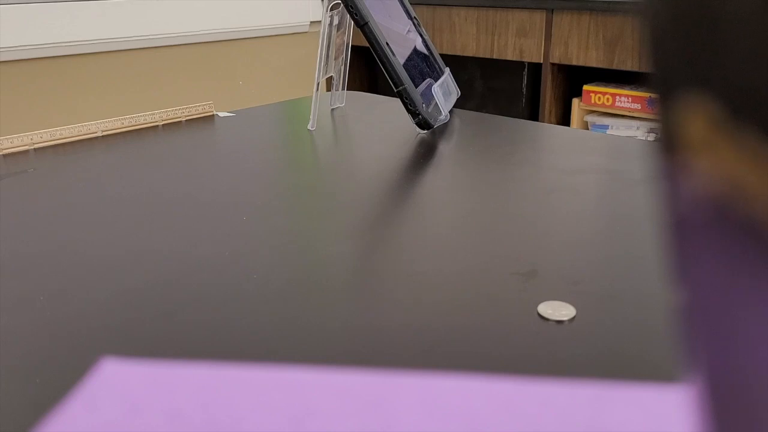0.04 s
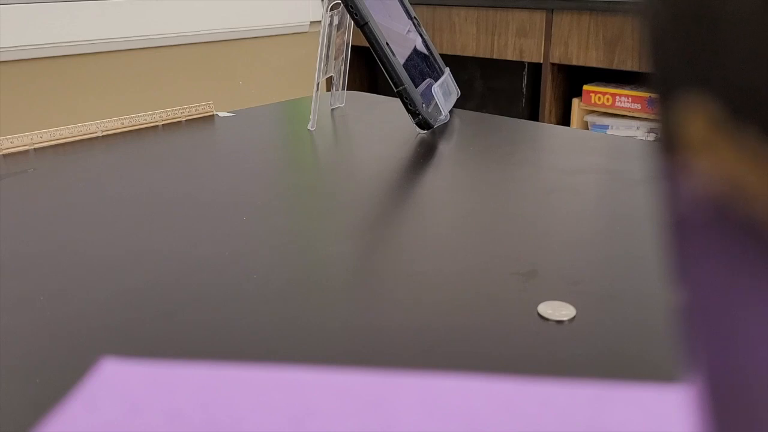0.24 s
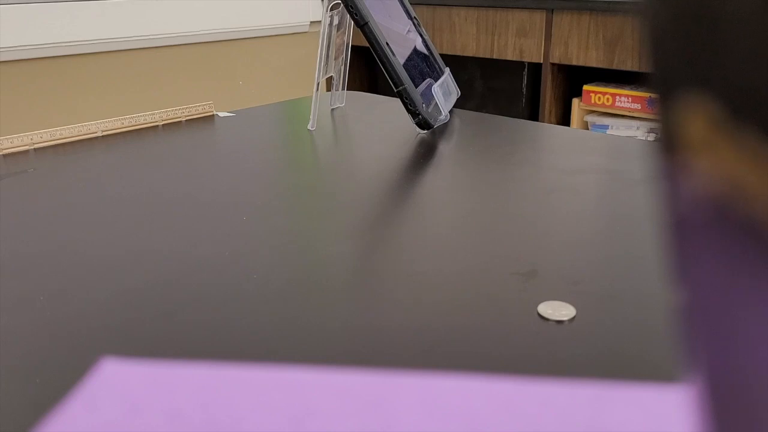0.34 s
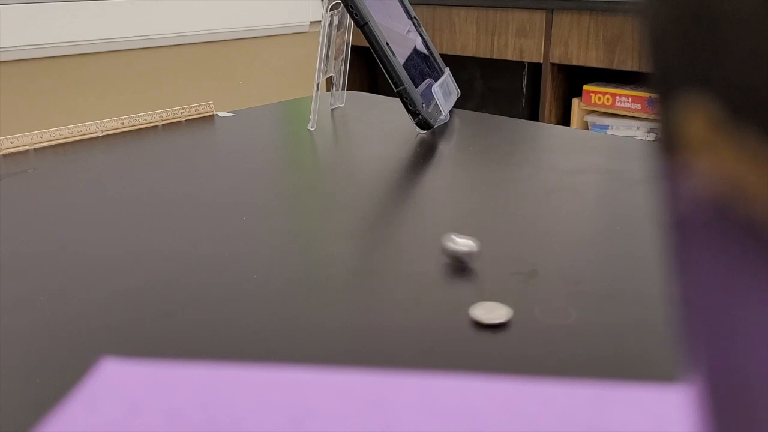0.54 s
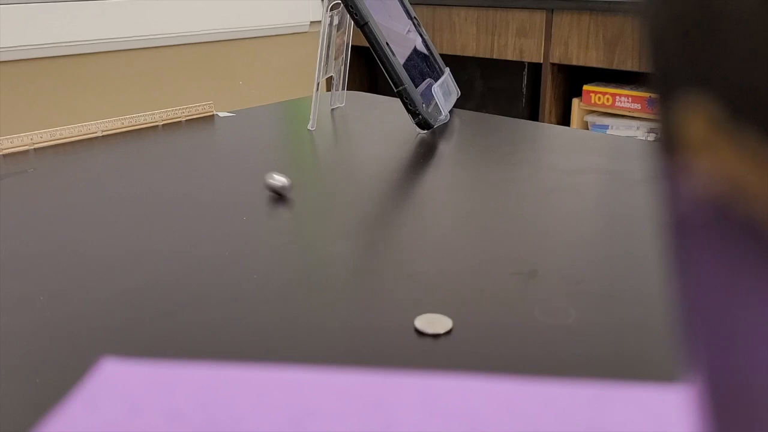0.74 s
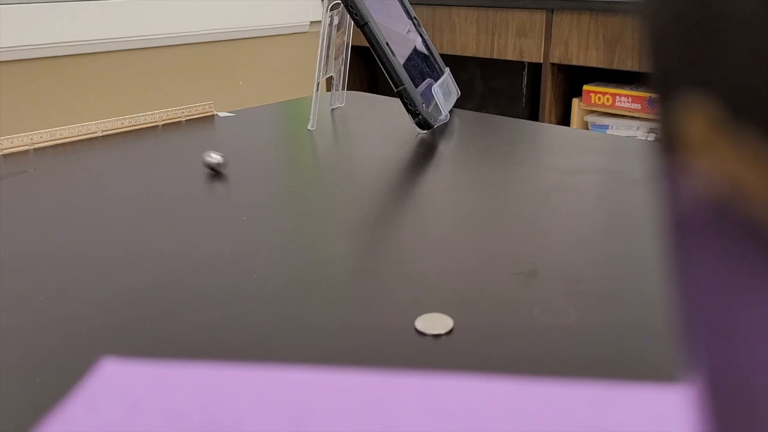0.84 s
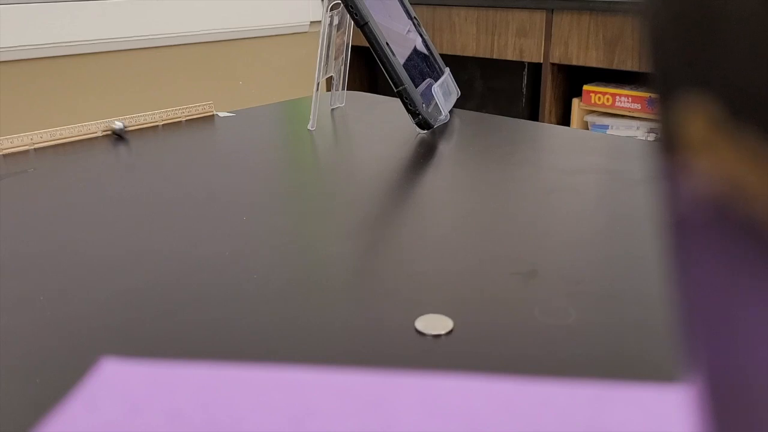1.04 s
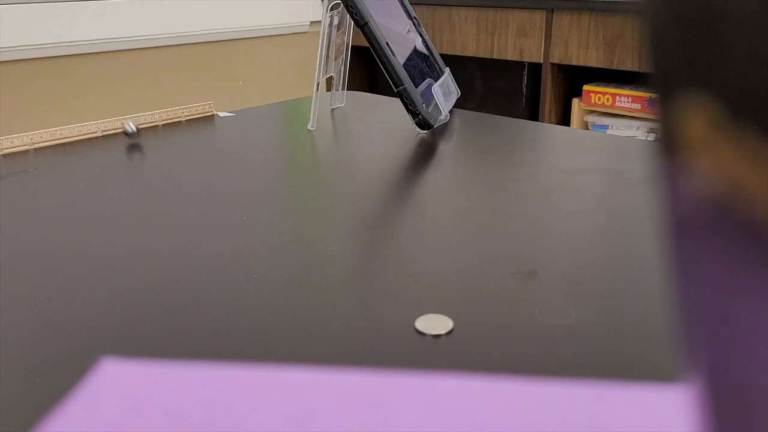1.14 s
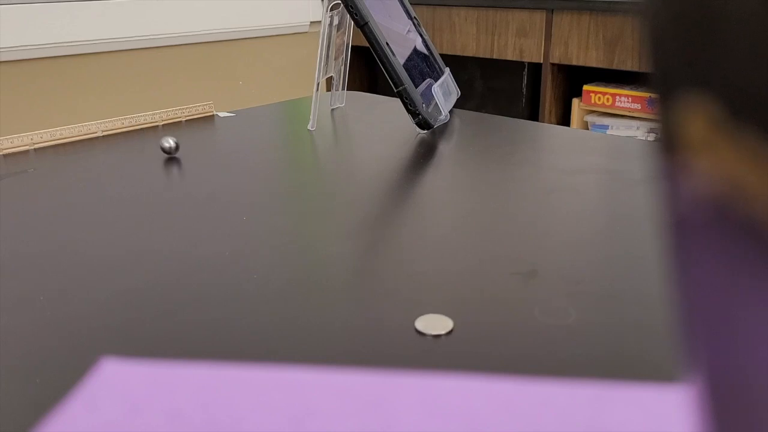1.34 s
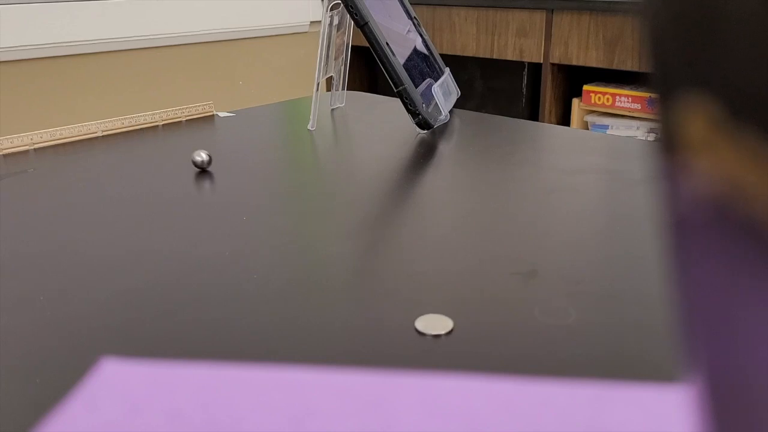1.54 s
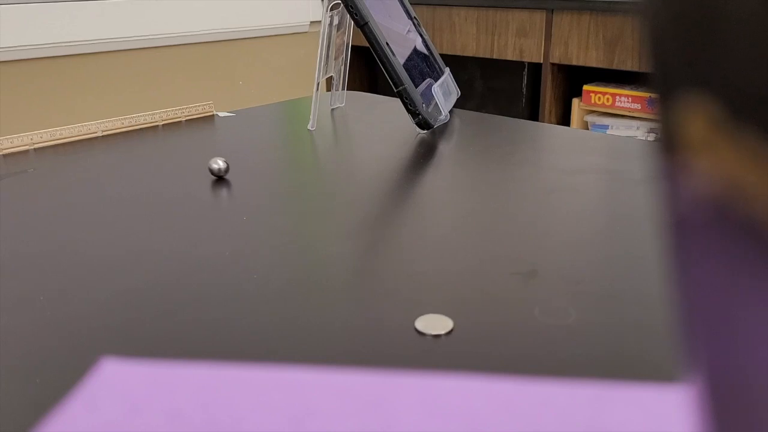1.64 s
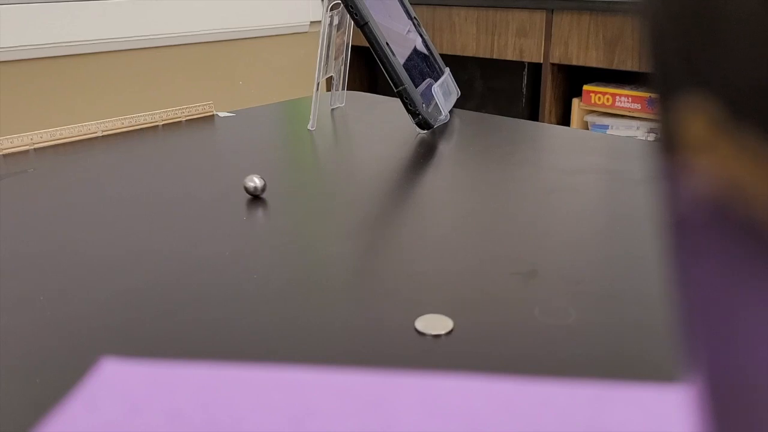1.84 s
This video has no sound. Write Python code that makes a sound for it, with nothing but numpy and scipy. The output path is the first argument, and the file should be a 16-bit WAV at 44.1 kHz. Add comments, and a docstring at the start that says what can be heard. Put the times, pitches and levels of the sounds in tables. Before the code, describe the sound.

A small steel ball bounces on a hard tabletop from 0.2 seconds in quickening, fading knocks. At 0.5 it hops afresh and clips a coin, which chatters with a very high ring until about 1.0. The ball rolls from 0.75, clacks brightly against a rail at 1.1, bounces again from 1.2 to 1.6, then rolls softly back. The microphone is on the table, in a small room with faint ventilation.

```python
"""Steel ball and coin on a tabletop

A small steel ball bounces across a hard tabletop in ever quicker hops, each a knock that sets the
board ringing. It clips a coin, which chatters and rings, then rolls on, clacks against the rail at
the far edge, bounces again and rolls slowly back. A phone on the table hears the board, a small
room and faint ventilation."""
import sys
import numpy as np
from scipy import signal
from scipy.fft import rfft, irfft
from scipy.io import wavfile
from scipy.ndimage import uniform_filter1d, minimum_filter1d

SR = 44100
rng = np.random.default_rng(int(sys.argv[2]) if len(sys.argv) > 2 else 0)


def waveform_to_disk(signal):
    """Save audio, clipped to [-1, 1], as 16-bit WAV at the path in sys.argv[1]."""
    frames = np.transpose(np.atleast_2d(signal))
    scaled = np.clip(frames, -1, 1) * 32767
    samples = np.round(scaled).astype(np.int16)
    wavfile.write(sys.argv[1], SR, samples)


N = 83790
T = np.arange(N) / SR
HZ = np.maximum(np.fft.rfftfreq(N, 1 / SR), 1)
KNOCK_SAMPLES = 2048
KNOCK_HZ = np.maximum(np.fft.rfftfreq(KNOCK_SAMPLES, 1 / SR), 1)
WAVE_LAG_S, WAVE_LAG_HZ = 0.00049, 980  # a bending wave's travel time at this pitch; lows come later
RAIL_S = 1.108

# Three runs of quickening hops: start_s, level_db, cutoff_hz
BALL_HOPS = [(.2112, 1, 4000), (.2753, 1, 3200), (.3272, 0.5, 2920), (.3688, -1, 2870), (.4014, -4.5, 3080),
             (.4296, -7, 2780), (.4518, -8.5, 3200), (.4712, -10, 2820), (.4866, -12, 2920),
             (.5064, -2.5, 3630), (.556, -1.5, 2970), (.599, -2.5, 2900), (.6342, -4, 2650),
             (.6658, -4.5, 2700), (.6892, -4.5, 2680), (.712, -8, 2400), (.731, -11.5, 2500),
             (.745, -13.5, 2400), (.76, -18, 2000), (1.2052, -1, 3900), (1.2838, -2.5, 3130),
             (1.3468, -2.5, 2600), (1.3978, -1.5, 2400), (1.4408, -2, 2400), (1.476, -5, 2400),
             (1.5054, -5.5, 2400), (1.5298, -7.5, 2400), (1.5505, -10, 2400), (1.569, -12.5, 2400),
             (1.585, -13, 2400), (1.598, -14, 2300), (1.611, -19, 2300), (1.623, -19, 2220),
             (1.634, -21, 2100)]
# Cues between the four places, as the ball passes the coin, nears the edge and rolls back: start_s
PLACE_CUES = [.49, .85, 1.64]


def ball():
    """Every hop and rolling bump pushes the board: a sharp knock first, then a ringing tail."""
    echo_noise = rng.standard_normal((300, 2, KNOCK_SAMPLES))
    hops = [(s, db, contact(cutoff_hz, tick=undb(-34.5))) for s, db, cutoff_hz in BALL_HOPS]
    bumps = rolling()
    ringing_bumps = [(s, db + 1, push) for s, db, push in bumps]  # rolling rings a little more
    return knocks(hops + bumps, echo_noise) + board_ring(hops + ringing_bumps)


# Swell and fade of the rolling rumble: time_s, level_db
ROLL_LEVELS = [(.74, -19), (.84, -18.5), (.89, -12), (.94, -13.5), (.99, -18), (1.07, -17), (1.098, -15),
               (1.11, -59), (1.58, -60), (1.63, -34), (1.68, -27), (1.74, -24.5), (1.82, -24.5),
               (1.9, -23.5)]


def rolling(out_hz=1970, back_hz=1305):
    """Rolling is a stream of tiny bumps, duller on the way back, when the ball is slower."""
    bumps = patter(ROLL_LEVELS, per_s=92, jitter=0.2, scatter_db=-1.3)
    return [(s, db, contact(out_hz if s < RAIL_S else back_hz)) for s, db in bumps]


def contact(cutoff_hz, tick=0):
    """Spectrum of one push: the contact softens the highs, and a tick lets some treble through."""
    softness = 1 / np.sqrt(1 + (KNOCK_HZ / cutoff_hz) ** 6)
    return causal(softness + tick)


# Tone colour of the knock: pitch_hz, before_coin_db, past_coin_db, near_edge_db
KNOCK_COLOUR = [(60, -35, -25.5, -42.5), (215, -6, -2.5, -18.5), (470, -6, -7.5, -4), (790, 5, 7.5, 1),
                (1130, -0.5, 4, 4), (1450, 8, 8, 6.5), (2100, 0.5, -4, 0.5), (2480, 0.5, 1, -0.5),
                (3200, -4.5, -2, -4), (4000, -8, -10.5, -8.5), (4990, -21, -33, -22.5),
                (6300, -14.5, -29, -10), (7900, -21, -35, -23), (13500, -13.5, -17, -9.5),
                (15860, -16, -29, -17.5)]
# Envelope of the edge echoes, a row for each of those three places: hold_s, decay_s
EDGE_ECHOES = [(0.0042, .003), (0.0038, 0.0036), (0.0016, 0.0035)]


def knocks(contacts, echo_noise, level_db=14.5, echo_memory_s=0.066):
    """Each contact sends out a bending wave, followed by its echoes from the table's edges."""
    t = T[:KNOCK_SAMPLES]
    envelopes = [np.exp(-np.maximum(t - hold_s, 0) / decay_s) for hold_s, decay_s in EDGE_ECHOES]
    travel = np.exp(-4j * np.pi * WAVE_LAG_S * np.sqrt(WAVE_LAG_HZ * KNOCK_HZ))
    colours = [travel * causal(undb(curve(KNOCK_COLOUR, KNOCK_HZ, column))) for column in (1, 2, 3)]
    out, lead_samples = np.zeros((2, N)), 256
    echoes, last_s = echo_noise[-1], 0
    for (s, db, push), fresh in zip(contacts, echo_noise):
        place = np.searchsorted(PLACE_CUES, s)
        zone = min(place, 2)  # the way back shares the knock of the edge
        kept = np.exp(-abs(s - last_s) / echo_memory_s)
        echoes = kept * echoes + np.sqrt(1 - kept ** 2) * fresh  # the pattern shifts as the ball travels
        last_s = s
        waves = rfft(echoes * envelopes[zone])
        waves[0] += 8.5  # the direct wave
        waves /= np.sqrt(uniform_filter1d(abs(waves) ** 2, size=40))  # keep the ripple, flatten the tilt
        knock = ports(*(waves * colours[zone] * push), KNOCK_HZ)
        knock = np.roll(knock, lead_samples, axis=1)
        if place == 0:
            knock = knock[::-1]  # before the coin, the ball is to the right of the phone
        knock /= np.sqrt(np.sum(knock ** 2) / 2)
        add(out, knock * undb(level_db + db), s - lead_samples / SR)
    return out


# Low notes of the board: pitch_hz, t60_s, before_coin_db, past_coin_db, near_edge_db, way_back_db
BOARD_MODES = [(63.9, 0.44, -24.5, -28, -41, -28), (169.3, 0.41, -32.5, -29.5, -61.5, -60),
               (198.4, 0.19, -50.5, -41.5, -27, -33.5), (279.4, 0.11, -33, -37, -56.5, -26.5),
               (345.5, 0.24, -27.5, -30, -41.5, -25.5), (487, 0.42, -36.5, -31, -35.5, -39.5),
               (700.7, 0.32, -21, -23.5, -33, -21.5), (748, 0.91, -38, -28, -51, -23.5),
               (797, 0.57, -48.5, -36, -38, -23), (971, 0.25, -30.5, -36, -29.5, -26),
               (1098.5, 0.21, -33, -32, -42.5, -14.5), (1430, 0.12, -25.5, -40, -47, -47),
               (1466, 0.43, -33, -35, -31, -43), (1643, 0.11, -30.5, -22.5, -22.5, -32),
               (2119, .07, -24.5, -47, -25.5, -25), (2529, 0.069, -24, -32, -33.5, -35)]
# Dense wash of board and room: pitch_hz, early_db, late_db, late_t60_s
BOARD_WASH = [(29.3, -23.5, -26, .8), (79, 3.5, -1.5, 0.75), (129, -21, -24.5, 0.44), (216, -9, -8, 0.81),
              (494, 1, -9, 0.57), (720, 10.5, -2.5, 0.81), (1420, 10.5, -8.5, 0.47), (2000, -5, -12.5, 1),
              (2840, -4.5, -7.5, 0.4), (5450, -22.5, -24.5, 0.41), (9620, -48, -12, 0.32),
              (13500, -12, -12.5, 0.079), (16000, -13, -23.5, 0.33)]
# Trim on that wash in each of the four places: level_db
WASH_TRIMS = [-2, -3.5, -3.5, -1]


def board_ring(contacts, wash_db=-6.5, build_s=0.0029):
    """The board rings on after each push, with a balance of modes set by where it is struck."""
    pushes = np.zeros((len(WASH_TRIMS), N))
    for s, db, push in contacts:
        add(pushes[np.searchsorted(PLACE_CUES, s)], irfft(push) * undb(db), s + WAVE_LAG_S)
    out = np.zeros((2, N))
    for place, trim_db in enumerate(WASH_TRIMS):
        modes = ring([(hz, levels_db[place], t60_s) for hz, t60_s, *levels_db in BOARD_MODES])
        wash = diffuse(BOARD_WASH, early_t60_s=0.075) * (1 - np.exp(-T / build_s))
        out += convolve(pushes[place], modes + undb(wash_db + trim_db) * wash)
    return out


# Slaps of the coin on the board: start_s, click_db, ring_db
COIN_SLAPS = [(0.5067, -1, -28.5), (0.5772, -5, -20), (0.625, -5.5, -24.5), (0.669, -19, -33.5),
              (0.7503, -24, -52), (0.7908, -15, -51.5), (0.8277, -16, -52.5), (0.8605, -13, -48),
              (0.8867, -21.5, -44.5), (0.912, -18.5, -44)]
# The coin's two glassy partials: pitch_hz
COIN_PITCHES = [13538, 14078]
# Weight and sustain of each partial: level_db, t60_s
COIN_PARTIALS = [(-8.5, .5), (1, 0.94)]
# Swell and fade of the wobbling rim's chatter: time_s, level_db
RIM_CHATTER = [(.51, -38), (.56, -23), (.6, -18.5), (.66, -18), (.72, -27.5), (.8, -33.5), (.9, -18),
               (.96, -30), (1.0, -56.5), (1.03, -49)]
# Colour and room tail of a coin click: pitch_hz, early_db, late_db, late_t60_s
COIN_CLICK = [(500, -37, -40.5, .4), (3360, 2.5, -13.5, 0.2), (6090, -4, -24.5, 0.61),
              (7500, -13, -33, 0.98), (9900, -2, -17, 0.28), (12330, -5, -21.5, 0.26),
              (13660, 5.5, -10, .22), (14200, -5.5, -25.5, .28), (15000, -23.5, -51, .3)]


def coin(flat_s=0.8, stop_s=0.027, flutter_db=2, buzz_depth=0.25):
    """The coin slaps down, rings very high and chatters on its rim; settling flat chokes the ring."""
    taps, ringing = np.zeros(N), np.zeros((2, N))
    tone = ring([(hz, db, t60_s) for hz, (db, t60_s) in zip(COIN_PITCHES, COIN_PARTIALS)])
    for s, click_db, ring_db in COIN_SLAPS:
        add(taps, undb([click_db]), s)
        ringing *= T < s  # each slap stops the old ring and starts a new one
        add(ringing, tone * undb(ring_db), s)
    for s, db in patter(RIM_CHATTER, per_s=340, jitter=0.55, scatter_db=2.5):
        add(taps, undb([db]), s)
    ringing *= np.exp(-np.maximum(T - flat_s, 0) / stop_s)
    ringing *= undb(flutter_db * wander(samples=300) - 4.5)  # the rocking coin flutters
    ringing *= 1 + buzz_depth * wander(samples=40)  # its rim roughens the ring
    spread = convolve(taps + undb(-6.5) * ringing[0], diffuse(COIN_CLICK, early_t60_s=0.01))
    return panned(ringing + undb(-13.5) * spread, left_db=4.5)


# Colour and room tail of the clack: pitch_hz, early_db, late_db, late_t60_s
RAIL_CLACK = [(102, -13.5, -41.5, 0.24), (380, 3.5, -5, 0.22), (805, -1.5, -6, 0.1), (1280, 7.5, -7, 0.27),
              (1805, 5, -13.5, 0.088), (2430, 11.5, -10.5, 0.25), (3200, -1.5, -19, 0.3),
              (3900, -5.5, -13, 0.41), (4510, 10.5, -15.5, .35), (5480, -9, -20.5, .28),
              (6170, 8, -16, 0.48), (6950, -10, -21.5, .3), (9020, -11.5, -25, 0.67),
              (10820, -20, -23, 0.31), (13140, -1.5, -14, .36), (15800, -16, -26.5, 0.27)]
# Short, bright partials on top of the clack: pitch_hz, level_db, t60_s
RAIL_PARTIALS = [(2400, -20, .063), (3620, -25, .073), (4380, -24, 0.073), (4830, -26.5, 0.049),
                 (5970, -22.5, 0.059), (5990, -21, 0.099), (6590, -26.5, .06), (8360, -29, 0.084),
                 (12300, -31, .1)]


def rail():
    """The ball meets the rail with one bright clack that rings briefly."""
    out = np.zeros((2, N))
    clack = undb(-5.5) * diffuse(RAIL_CLACK, early_t60_s=0.023)
    add(out, clack + ring(RAIL_PARTIALS), RAIL_S)
    return panned(out, left_db=0.5)


# Tone colour of the air bed, mostly low rumble: pitch_hz, relative_db
AIR_COLOUR = [(15, -49.5), (25, -9.5), (37, 3.5), (90, -8), (125, -8.5), (427, -12), (3090, -26.5),
              (3440, -28.5), (6720, -47.5), (15000, -46.5)]


def ventilation(level_db=-48.5):
    """Moving air lays a faint, steady noise under everything."""
    spectra = rfft(rng.standard_normal((2, N))) * undb(curve(AIR_COLOUR, HZ))
    air = ports(*spectra, HZ)
    return air * undb(level_db) / air.std()


# Stereo image of the phone's microphones: pitch_hz, likeness (0-1), left_over_right_db, left_lead_rad
STEREO_IMAGE = [(60.6, 0.95, -2.5, 0.51), (173, 1, -3.5, 0.065), (307, 0.2, 0, 1.3), (573, 0.65, 2, 2.36),
                (1320, 0.83, 0.5, 2.44), (2600, 0.78, -0.5, 1.55), (5100, 0, 2.5, 2.1),
                (14000, 0.5, 1.5, 1.4)]


def ports(a, b, hz):
    """Two spectra become the partly alike left and right signals at the microphone ports."""
    likeness = np.clip(curve(STEREO_IMAGE, hz), 0, 1)
    pan = undb(curve(STEREO_IMAGE, hz, column=2) / 2)
    lead_rad = curve(STEREO_IMAGE, hz, column=3)
    right = likeness * a * np.exp(-1j * lead_rad) + np.sqrt(1 - likeness ** 2) * b
    return irfft(np.array([a * pan, right / pan]))


def ring(modes):
    """Stereo response of struck modes (pitch_hz, level_db, t60_s), each a dying sine."""
    spectrum = rfft(sum(undb(db) * fade(t60_s) * np.sin(2 * np.pi * hz * T) for hz, db, t60_s in modes))
    return ports(spectrum, -1j * spectrum, HZ)


def diffuse(table, early_t60_s):
    """Response of countless modes: a quick early decay, then the room with its own decay per band."""
    early_noise, room_noise = rng.standard_normal((2, 2, N))
    early = rfft(early_noise * fade(early_t60_s)) * causal(undb(curve(table, HZ)))
    pitches_hz, _, _, t60s_s = np.array(table).T
    bands = [np.interp(np.log(HZ), np.log(pitches_hz), peak) for peak in np.eye(len(table))]
    room = rfft(room_noise)
    tail = sum(irfft(room * band) * fade(t60_s) for band, t60_s in zip(bands, t60s_s))
    late = rfft(tail) * causal(undb(curve(table, HZ, column=2)))
    fade_out = np.clip(2 - T / 0.8, 0, 1)
    return ports(*(early + late), HZ) * fade_out


def patter(levels, per_s, jitter, scatter_db):
    """Uneven small contacts (start_s, level_db) that follow a level curve."""
    times_s, levels_db = np.array(levels).T
    timing, strength = rng.standard_normal((256, 2)).T
    start_s = times_s[0] + np.cumsum(np.exp(jitter * timing)) / per_s
    level_db = np.interp(start_s, times_s, levels_db) + scatter_db * strength
    return np.c_[start_s, level_db][start_s < times_s[-1]]


def wander(samples):
    """Smoothed stereo noise of unit spread, for modulation."""
    drift = uniform_filter1d(rng.standard_normal((2, N)), size=samples, axis=1)
    return drift / drift.std()


def undb(db):
    """Decibels to gain."""
    return 10 ** (np.asarray(db) / 20)


def curve(table, hz, column=1):
    """One column of a table over log frequency."""
    table = np.array(table, float)
    return np.interp(np.log(hz), np.log(table[:, 0]), table[:, column])


def causal(gain):
    """Minimum-phase frequency response with the given gains."""
    cepstrum = irfft(np.log(gain + 1e-7))
    half = len(cepstrum) // 2
    cepstrum[1:half] *= 2
    cepstrum[half + 1:] = 0
    return np.exp(rfft(cepstrum))


def add(out, x, start_s):
    """Mix x in at start_s."""
    i = int(np.clip(start_s * SR, 0, N - 1))
    out[..., i:i + x.shape[-1]] += x[..., :N - i]


def convolve(x, response):
    """Play x through a stereo response."""
    return signal.fftconvolve(np.atleast_2d(x), response, axes=1)[:, :N]


def fade(t60_s):
    """Exponential decay, 60 dB down after t60_s."""
    return np.exp(-np.log(1000) * T / t60_s)


def panned(x, left_db):
    """Shift a sound to the left."""
    return x * undb(np.array([[left_db], [-left_db]]) / 2)


def scene():
    """Ball, coin and rail in the quiet room."""
    return ball() + coin() + rail() + ventilation()


def record(dry, low_cut_hz=67, top_hz=15900):
    """The phone drops the deepest bass, turns down the highest peaks for a moment and cuts the top."""
    x = signal.sosfilt(signal.butter(2, low_cut_hz, "high", fs=SR, output="sos"), dry)
    peaks = np.maximum(abs(x).max(axis=0), 1)
    gain = uniform_filter1d(minimum_filter1d(1 / peaks, size=65), size=65)
    return signal.sosfilt(signal.ellip(10, 0.2, 80, top_hz, fs=SR, output="sos"), x * gain)


dry = scene()
out = record(dry)
waveform_to_disk(out)
```